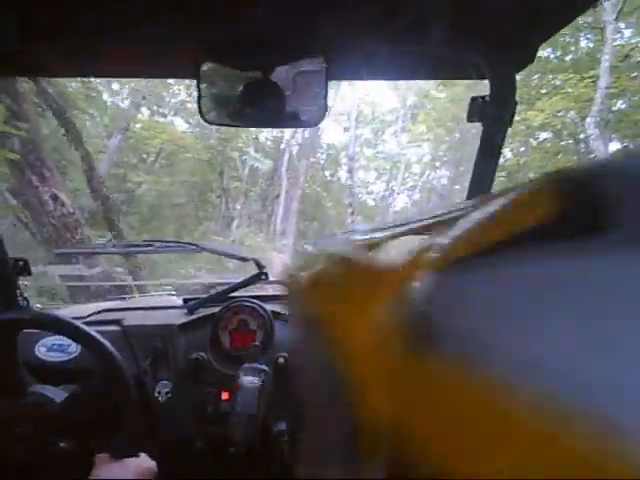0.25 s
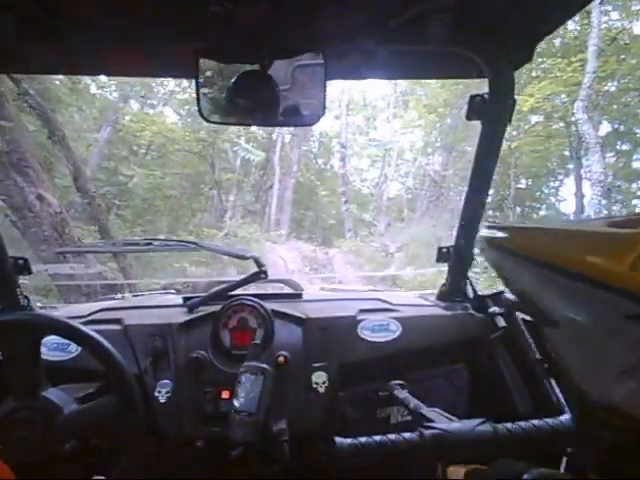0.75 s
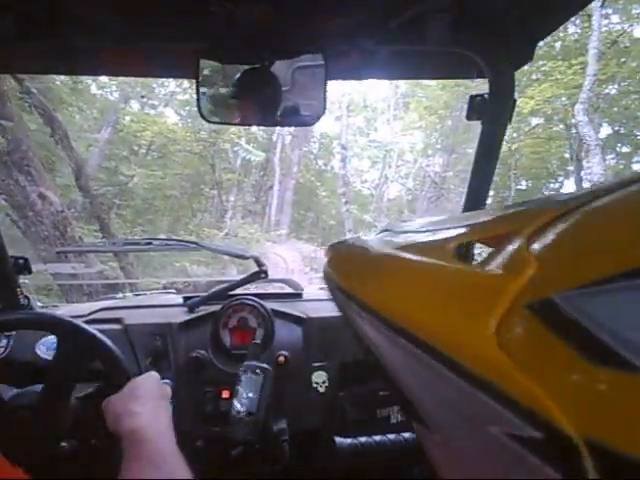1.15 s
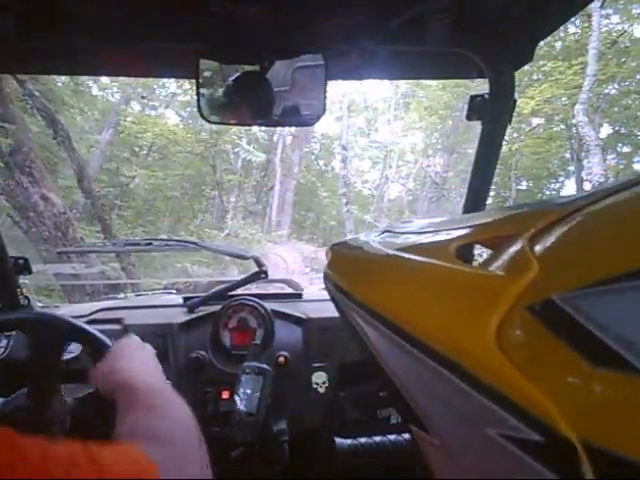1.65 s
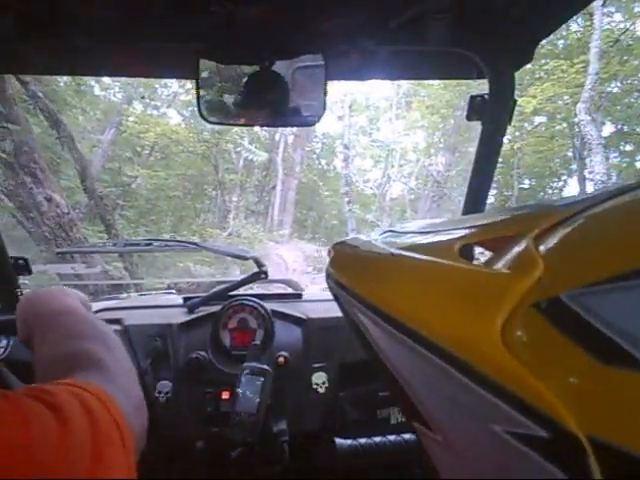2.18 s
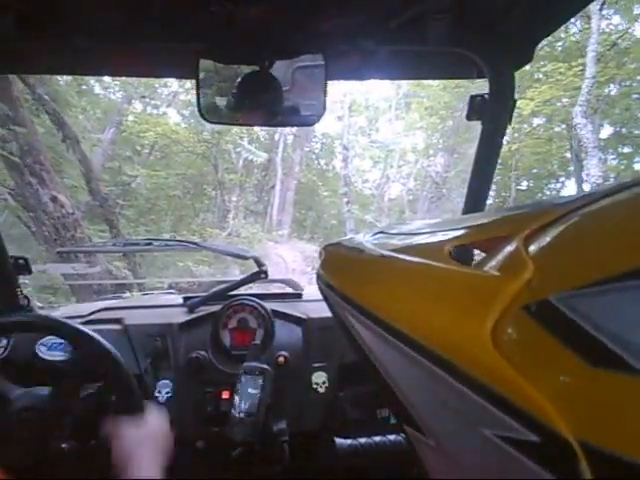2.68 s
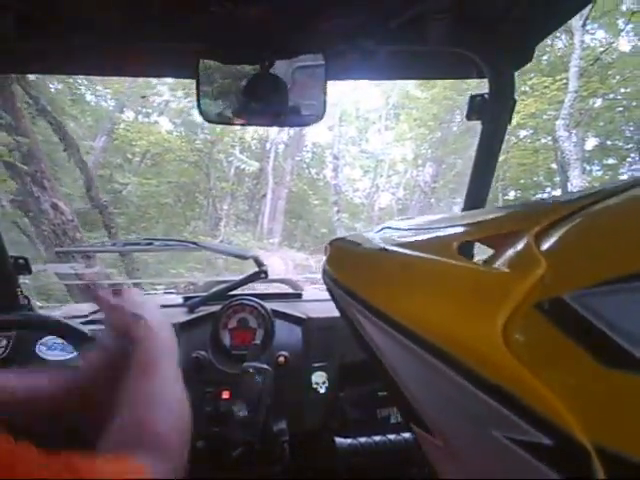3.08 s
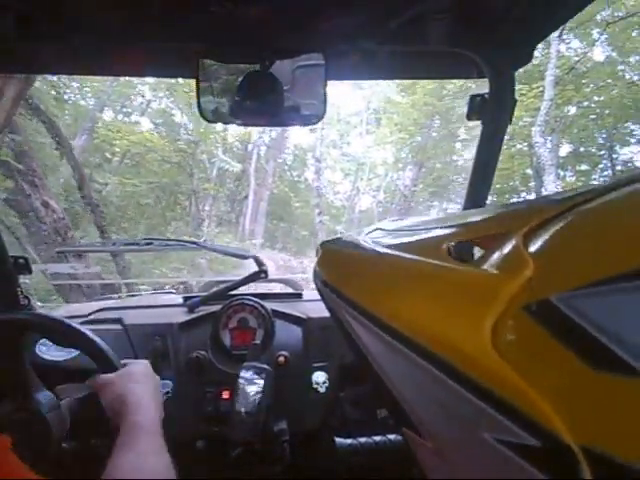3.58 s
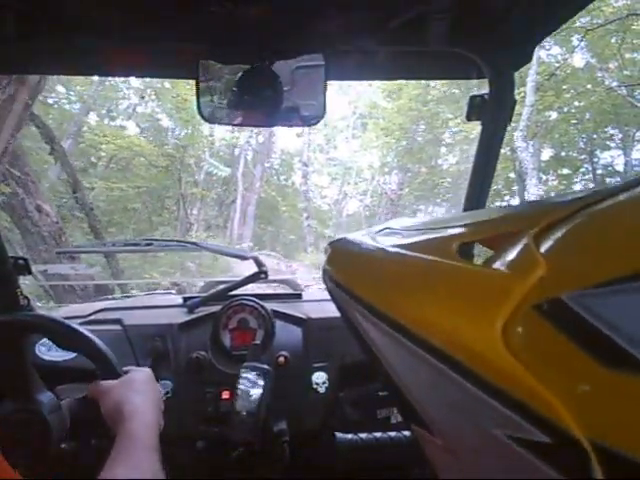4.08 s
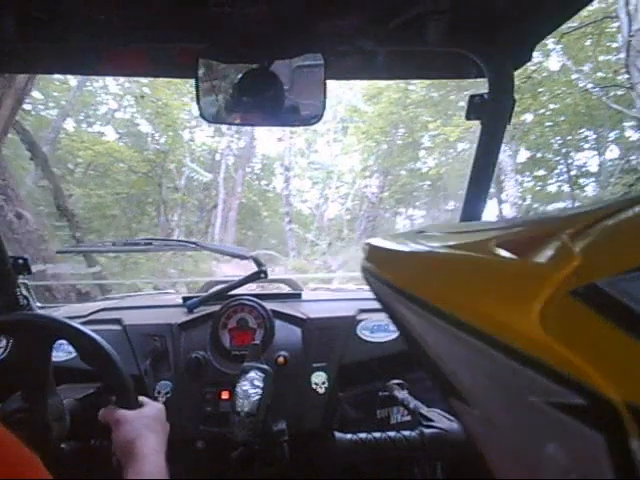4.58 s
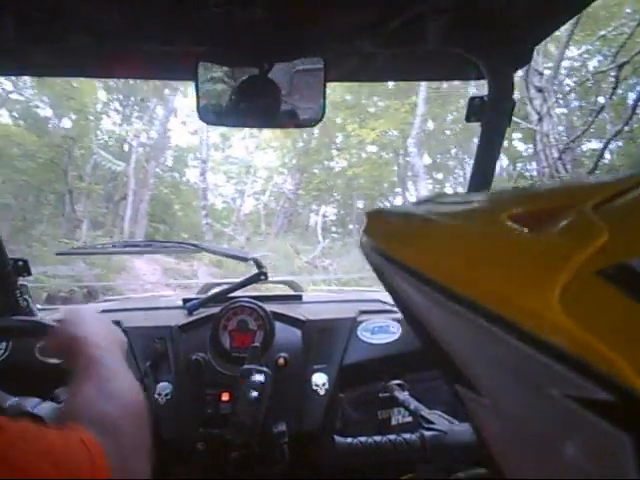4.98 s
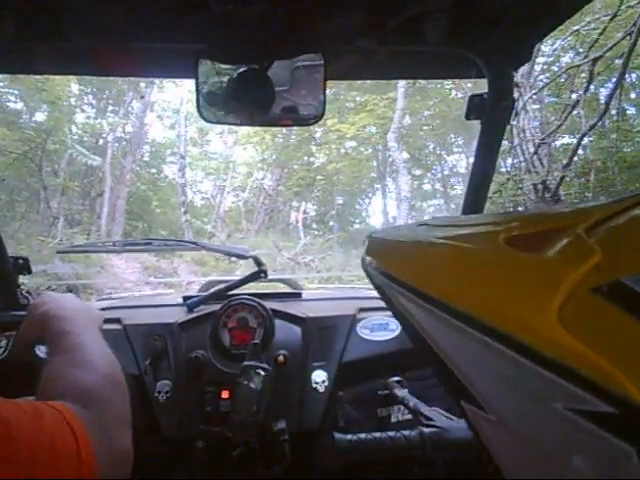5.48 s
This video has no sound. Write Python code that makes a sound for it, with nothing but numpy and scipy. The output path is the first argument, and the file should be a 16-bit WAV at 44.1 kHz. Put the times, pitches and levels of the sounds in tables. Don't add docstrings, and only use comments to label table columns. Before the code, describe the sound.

A two-cylinder engine starts high, with loud knocks as its revs fall, and settles to slow chugging with a clacking drive line. A brief dash clatter and later a grainy brush along the bodywork interrupt the idle. Then the throttle opens: revs climb fast, the cab drones, intake air roars and loose parts snap. Close, boxy in-cab microphone, clipping when loud.

```python
import sys
import numpy as np
from scipy import signal
from scipy.fft import rfft, irfft
from scipy.io import wavfile
from scipy.ndimage import uniform_filter1d

SR = 44100
rng = np.random.default_rng(int(sys.argv[2]) if len(sys.argv) > 2 else 0)


def invert_db(x):
    u = np.asarray(x, float) / 20
    return 10 ** u


def int16_out(signal):
    q = np.round(np.clip(np.atleast_2d(signal).T, -1, 1) * 32767)
    wavfile.write(sys.argv[1], SR, q.astype(np.int16))


N = 253134
TIME = np.arange(N) / SR


def evened(x):
    return x / np.sqrt(np.mean(x ** 2) + 1e-20)


def steadied(x, window):
    return x / np.sqrt(uniform_filter1d(x ** 2, size=window) + 1e-9)


def blend(clean, noisy, share):
    return share * evened(clean) + np.sqrt(1 - share ** 2) * evened(noisy)


def curves(rows):
    s, *columns = np.transpose(rows)
    return [np.interp(TIME, s, c) for c in columns]


def read(points, hz):
    f, db = np.transpose(points)
    return np.interp(np.log(hz + 1), np.log(f + 1), db)


def coloured(x, points):
    return irfft(rfft(x) * invert_db(read(points, np.fft.rfftfreq(N, 1 / SR))), N)


def panels(x, modes):
    out = np.zeros(N)
    for k, (hz, width, db) in enumerate(modes):
        pole = np.exp((2j * np.pi * hz - 1.5 * np.pi * width) / SR)
        ring = signal.lfilter([(1 - abs(pole)) ** 2], [1, -2 * pole, pole ** 2], x)
        out += (-1) ** k * invert_db(db) * ring.real
    return out


def noise():
    return rng.standard_normal(N)


def wander(hz):
    steps = rng.standard_normal(N // 100 + 2)
    drift = signal.sosfiltfilt(signal.butter(2, hz, fs=SR / 100, output="sos"), steps)
    return np.interp(TIME, np.arange(len(steps)) * 100 / SR, evened(drift))


def clicks(events):
    train = np.zeros(N)
    for s, db in events:
        train[round(s * SR)] = invert_db(db)
    return train


def bursts(events, decay_s, rise_s):
    t = np.arange(2000) / SR
    shape = np.exp(-t / decay_s) * (1 - np.exp(-t / rise_s))
    return signal.oaconvolve(clicks(events), shape)[:N] * noise()


def runs(rows, ends_db, spread_db):
    hits = []
    for first, gap, count, db, *share in rows:
        k, chance = np.arange(round(count)), rng.standard_normal(16)
        arch = (2 * (k + .5) / len(k) - 1) ** 2
        hits += [(first + gap * i, db + ends_db * arch[i] + spread_db * chance[i], *share) for i in k]
    return hits


# (time [s], crank speed [turns/s])
SPEED = [(0.0, 68.48), (0.2, 53.55), (0.33, 39.03), (0.55, 25.12), (0.95, 20.89), (1.6, 20.33),
         (2.5, 20.08), (3.0, 20.52), (3.3, 19.89), (4.05, 20.3), (4.31, 50.36), (4.62, 68.88), (4.8, 85.13),
         (4.95, 97.2), (5.16, 106), (5.4, 96.86), (5.66, 93.65), (5.74, 91)]


def crank():
    hz = curves(SPEED)[0]
    return hz, np.cumsum(hz) / SR


# (time [s], load [0-1], exhaust level [dB], cab shaking level [dB],
# chassis rumble against the exhaust [dB])
WORK = [(0, 1, -21.5, -22, -2), (.1, 1, -21, -19.5, 4.5), (.2, 0.93, -24, -16.5, 17),
        (.32, 0.72, -17, -18, -0.5), (.4, 0.73, -27, -23, -1), (.5, 0.64, -35.5, -37.5, -4),
        (.93, 0.19, -36.5, -43, -8), (1.05, 0.23, -37.5, -43.5, -5.5), (1.75, 0.2, -38.5, -44.5, -9),
        (2.3, 0.29, -39, -44.5, -5.5), (3.4, 0.07, -37, -41, -8), (4.05, 0.37, -37, -42.5, -5.5),
        (4.15, 0, -26.5, -34.5, -1.5), (4.38, 0.84, -23.5, -27.5, -10), (4.65, 0.56, -25.5, -25, -12),
        (4.8, 0.92, -25, -18.5, -1.5), (5.25, 1, -19, -14.5, -9), (5.74, 0.94, -25, -20.5, -4)]


def work():
    return curves(WORK)


# (crank order [waves/turn], idle level [dB], full load level [dB])
ORDERS = [(.5, -54, 0.5), (1, -6.5, 3.5), (1.5, -21, -10), (2, 6.5, 2), (2.5, -60, -11.5), (3, -6.5, -12.5),
          (4, 0, -10.5), (5, -4, -15), (6, -8.5, -2), (7, -15.5, -9), (8, -21, -44), (9, -34, -8.5),
          (10, -27, 7), (11, -14, -27), (12, -28, 8)]
# (frequency [Hz], level [dB])
PIPE = [(10, 24), (20, -10), (45, -3.5), (70, 0.5), (105, 3.5), (140, -5.5), (190, -1.5), (300, -11),
        (600, -7.5), (1300, -66)]
# (frequency [Hz], level [dB])
RUMBLE = [(8, -2.5), (20, -13.5), (45, 1), (90, -0.5), (130, -3), (170, -12), (280, -23), (340, -44.5)]
# (crank speed [turns/s], first order level [dB], second order level [dB])
BOOM = [(20, 0, 3), (28, 12, -7), (44, 8, 3), (51, -20, 1), (56, -1, 1), (70, 6, 6), (79, 7, -4),
        (82.5, -12, -13), (86, 3, -6), (96, 0, -7)]


def exhaust():
    hz, turns = crank()
    load, thump_db, _, rumble_db = work()
    speeds, first, second = np.transpose(BOOM)
    falling = TIME < .4
    boom_db = {1: np.where(falling, -7, np.interp(hz, speeds, first)),
               2: np.where(falling, -5.5, np.interp(hz, speeds, second))}
    thump = np.zeros(N)
    for order, idle_db, load_db in ORDERS:
        level_db = idle_db + load * (load_db - idle_db)
        level_db = level_db + read(PIPE, order * hz) + boom_db.get(order, 0)
        angle = 2 * np.pi * order * (turns - .775) - .5 - 1.1 / order ** 3
        angle = angle + .15 * np.sqrt(order) * wander(hz=6)
        thump -= invert_db(level_db + 1.5 * wander(hz=7)) * np.cos(angle)
    thump = steadied(thump, 8000)
    thump += invert_db(rumble_db) * evened(coloured(noise(), RUMBLE))
    return invert_db(thump_db + 4) * thump / np.sqrt(1 + invert_db(2 * rumble_db))


def shaking(steady, quick, shudder):
    turns = crank()[1]
    jolt, after = turns - .02, turns - .21
    sizes = invert_db(1.1 * rng.standard_normal((1000, 2)))
    force = sizes[jolt.astype(int), 0] * np.exp(-(jolt % 1) / quick)
    force += shudder * sizes[after.astype(int), 1] * np.exp(-(after % 1) / .25)
    force = steady + uniform_filter1d(force, size=90)
    force = force / np.sqrt(uniform_filter1d(force ** 2, size=6000))
    return force * invert_db(1.2 * wander(hz=12)) * noise()


# (middle time [s], half length [s], buzz change [dB], rattle change
# [dB], fizz change [dB])
LURCHES = [(0.046, 0.04, -9, -7.5, -11), (0.124, 0.019, -12, -14, -19), (0.355, 0.026, -13, -8.5, -4),
           (0.385, 0.019, -2, 6.5, 8), (0.419, 0.0089, -7, -5, -10), (0.484, 0.033, 0.5, 3, 9.5),
           (0.922, 0.01, -4, 2, 11), (2.905, 0.014, 2.5, -2, 1), (0.73, 0.042, 3, 7.5, 4.5),
           (2.065, 0.11, 5.5, 2.5, 3), (2.687, 0.014, 7.5, 8, 0), (2.99, 0.09, 0, 2, 4),
           (3.074, 0.096, 3.5, 6, 8), (4.003, 0.047, 7, 6, 4), (4.18, 0.071, -0.5, 2.5, 0),
           (4.771, 0.015, 4.5, 4.5, -3), (5.126, 0.019, -8.5, 0.5, 9)]


def lurches():
    return sum(np.outer(db, np.exp(-((TIME - s) / half) ** 2)) for s, half, *db in LURCHES)


SHAKE_IDLE_DB = -45

# (frequency [Hz], width [Hz], level [dB])
LARGE_PANELS = [(229, 116, -10.5), (395.8, 32.6, 1.5), (529, 55, -4.5), (607, 38, -2), (751, 132, -6),
                (848.7, 27, -1), (914.7, 58, 1.5), (1056, 45, -11.5)]


def buzz():
    hz, (load, _, shake_db, _) = crank()[0], work()
    rough = panels(shaking(steady=0.64 + 0.8 * load, quick=0.25, shudder=0.93), LARGE_PANELS)
    share = .8 * np.clip((hz - 22) / 25, 0, 1) * (TIME > 2)
    return invert_db(lurches()[0] + shake_db) * blend(drone(), rough, share)


# (frequency [Hz], width [Hz], level [dB])
SMALL_PANELS = [(1240, 1030, -12), (1583.5, 47, -2.5), (1878, 230, -10.5), (2045, 123, -0.4),
                (2240, 150, -7), (3272, 337, -9.5), (3594, 320, -7), (3938, 620, -11), (4660, 1360, -26),
                (5140, 320, -17.5)]
# (frequency [Hz], level [dB])
ROAR = [(900, -22), (1300, 4.5), (2000, 11.5), (2700, 0), (4000, -20), (6000, -20), (8000, -45)]
# (time [s], share [0-1])
SCRAPE = [
    (0, 0.37),
    (2.85, 0.27),
    (2.95, 0.8),
    (3.08, 1),
    (3.25, 0.8),
    (3.45, 1),
    (3.6, 0.4),
    (5.74, 1),
]


def rattle():
    load, _, shake_db, _ = work()
    steady = .12 + .6 * load + .8 * curves(SCRAPE)[0]
    rough = panels(shaking(steady, quick=.09, shudder=.3), SMALL_PANELS)
    level_db = lurches()[1] - 52 + shake_db - SHAKE_IDLE_DB
    return invert_db(level_db) * blend(coloured(noise(), ROAR), rough, .7 * load)


# (frequency [Hz], level [dB])
FIZZ = [(4000, -21), (5000, 12.5), (7300, 3.5), (8200, 10), (10500, 9.5), (12000, 7), (14000, -26),
        (17000, 10)]


def fizz():
    load, _, shake_db, _ = work()
    level_db = lurches()[2] - 64 + 0.73 * (shake_db - SHAKE_IDLE_DB) + 8 * load
    return invert_db(level_db) * evened(coloured(shaking(steady=1.5, quick=0.033, shudder=0.64), FIZZ))


# (frequency [Hz], level [dB])
WHINE = [(8000, -80), (9000, -82), (10000, -75), (15306, -75)]


def whine():
    return sum(invert_db(db + 3.6) * np.sin(2 * np.pi * hz * TIME + .5 * wander(hz=5)) for hz, db in WHINE)


# (time [s], peak level [dB], bright share [dB], low share [dB])
KNOCKS = [(0.0024, -18.5, -14, -20), (0.1143, -16, -8, -19), (0.152, -21, -23, 3), (0.2026, -12, -12.5, -4),
          (0.249, -8, -13, -21), (0.2863, -9.5, -3.5, -25), (0.2995, -6, -2.5, -24), (0.329, -13, -15, -20),
          (0.3708, -14, -12, 3.5), (0.4313, -18, -19, -3), (0.4542, -25.5, -4, -2), (0.486, -28, -7, 4),
          (0.5622, -32.5, -12, -12), (0.584, -27, -12.5, 5), (0.8005, -28.5, -25, -1), (0.927, -38, -20, 3),
          (1.8035, -41.5, -10, 16), (2.3765, -29, -19, -3), (2.8464, -29.5, -22, -5),
          (2.898, -34.5, -28, 7), (3.351, -26, -11, -4), (3.4157, -25.5, -37, -2), (3.4736, -18, -16, -4.5),
          (3.9698, -23.5, -16, -22), (4.085, -30.5, -22, 1.5), (4.3283, -24, -13, 6),
          (4.7437, -19.5, -11.5, -14), (5.003, -6, -21, -9), (5.1256, -6, -16, -22),
          (5.3828, -10.5, -34, -18),
          (.0832, -24, -25, -3), (0.14, -34, -18, -5), (.599, -36, -18, -10), (0.6134, -31.5, -18, -8),
        (0.624, -28.5, -21, -14), (.6366, -30, -20, -12), (0.649, -31, -13, -12), (0.6597, -27, -20, -6),
        (0.6721, -23, -22, 1.5), (0.68, -29.5, -11, 0), (.69, -33, -9, -8), (0.702, -39, -17, -8),
        (.717, -31.5, -24, 1), (.7643, -34, -28, -5), (.883, -41, -26, 5), (1.9914, -38, -24, -10),
        (2.006, -41, -26, -8), (2.0115, -32, -26, -8), (2.163, -44, -7, -10), (2.328, -36.5, -25, -10),
        (2.415, -33.5, -25, -4), (2.678, -35, -35, 0), (2.687, -30, -38, 5), (2.716, -30.5, -20, 7.5),
        (2.745, -53, -25, -7), (2.911, -32, -18, -3), (3.191, -42, -31, -6), (3.247, -28.5, -31, 0),
        (3.642, -46, -30, 8), (3.937, -40, -26, 5), (4.012, -29, -26, 3), (4.165, -34, -11, -8),
        (4.203, -37, -13, -4), (4.8435, -20, -14, -12), (4.9876, -19, -19, -12), (5.04, -18, -26, -10),
        (5.2088, -23, -15, -12), (5.355, -19, -15, -10), (5.432, -11, -31, -15), (5.515, -20.5, -14, -15)]
# (first time [s], gap [s], knocks [count], loudest level [dB], bright share [dB])
CHATTERS = [
    (3.305, .07, 1, -29, -36),
    (3.5094, .027, 4, -36, -22),
    (4.001, .011, 2, -29, -22),
    (5.2914, .121, 2, -13, -14),
    (4.197, .05, 1, -22, -18),
    (.0354, .07, 1, -24, -27),
]
# (time [s], peak level [dB], bright share [dB])
CLATTER = [
    (2.02, -24, -34),
    (2.0265, -17, -32),
    (2.043, -23.5, -16),
    (2.059, -19, -26),
    (2.0706, -18.5, -17),
    (2.083, -19, -21),
    (2.0925, -23.5, -30),
    (2.109, -25, -23),
    (2.124, -22, -20.5),
    (2.1324, -48, -25),
]
# (frequency [Hz], width [Hz], level [dB])
BRACKET = [(1579, 19, -12.5), (1945, 94, -1), (3453, 102, -13.5), (3915, 64, -11.5), (4514, 69, -18)]
# (frequency [Hz], level [dB])
CRACK = [(3000, -62), (4500, 4), (6500, -4), (9500, 0.5), (11800, -2), (13000, -23), (16000, -30)]


def knocks():
    chatter = runs(CHATTERS, ends_db=-23, spread_db=6.5) + CLATTER
    chatter = [(*hit, -14) for hit in chatter]
    s, db, bright_db, low_db = np.transpose(KNOCKS + chatter)
    lower = [m for m in SMALL_PANELS if m[0] < 2600]
    upper = [m for m in SMALL_PANELS if m[0] > 2600]
    upper_db = db + 0.33 * (bright_db + 16)
    out = invert_db(42.5) * panels(clicks(zip(s, db)), BRACKET)
    out += invert_db(19.5) * panels(bursts(zip(s, db), decay_s=0.0045, rise_s=0.0012), lower)
    out += invert_db(19) * panels(bursts(zip(s, upper_db), decay_s=0.0047, rise_s=0.00068), upper)
    out += invert_db(23) * panels(bursts(zip(s, db + low_db), decay_s=0.0026, rise_s=0.00039), LARGE_PANELS)
    cracks = bursts(zip(s, db + bright_db), decay_s=0.0051, rise_s=0.00073)
    return out + invert_db(4) * coloured(cracks, CRACK)


# (time [s], peak level [dB])
SNAPS = [(0.1155, -13), (.4865, -32), (.82, -38), (1.0525, -35), (1.3185, -42), (2.553, -24.5),
         (2.654, -44), (3.3518, -33), (3.4752, -38), (3.6193, -43), (4.153, -31), (4.3298, -22),
         (4.4537, -28), (5.138, -22), (5.293, -21), (5.454, -25), (5.487, -26), (5.541, -25)]
# (frequency [Hz], level [dB])
SNAP_TONE = [(1000, -20), (2500, 0), (5000, 1), (9000, -3), (13000, -5), (17000, -2)]


def snaps():
    return invert_db(9.5) * coloured(clicks(SNAPS), SNAP_TONE)


# (frequency [Hz], width [Hz], level [dB])
CASING = [(600, 40, -2), (918, 79, -2.5), (1577, 34, -6), (2110, 90, -1), (3280, 90, -8)]


def clack():
    turn = (crank()[1] - .02).astype(int)
    size = invert_db(1.5 * rng.standard_normal(1000))[turn] * (1 - work()[0]) ** 2
    return invert_db(13) * panels(size * (np.diff(turn, prepend=0) > 0), CASING)


# (time [s], peak level [dB])
THUDS = [
    (0.249, -41),
    (0.559, -31),
    (0.672, -26),
    (1.8, -35),
    (2.909, -31),
    (3.5, -29.5),
    (3.75, -33.5),
    (3.905, -32),
    (3.952, -30),
]
# (frequency [Hz], width [Hz], level [dB])
FLOOR = [(132, 32, 1), (187, 29, 7.5), (258, 460, -7)]


def thuds():
    return invert_db(24) * panels(bursts(THUDS, decay_s=0.022, rise_s=0.007), FLOOR)


# (first time [s], gap [s], ticks [count], peak level [dB])
TICKS = [(0.5366, .183, 2, -27), (.698, .05, 1, -32), (.9438, .05, 1, -29), (1.5026, .083, 2, -38),
         (2.1715, .05, 1, -33), (2.2217, .025, 3, -30), (3.0909, .05, 1, -35), (3.1114, .024, 3, -32),
         (3.2093, .023, 2, -32), (3.2844, .046, 2, -33), (3.4535, .05, 1, -33), (3.5059, .0253, 6, -31),
         (3.884, .025, 1, -35), (4.003, .025, 3, -30), (4.1053, .029, 2, -29), (4.3021, .079, 2, -28),
         (4.2279, .027, 2, -31), (4.325, .02, 2, -31), (4.399, .036, 3, -32), (4.4169, .03, 1, -27),
         (5.4525, .043, 3, -23)]
# (frequency [Hz], level [dB])
TICK_TONE = [(4500, -33), (7000, -13), (8300, 0), (10500, 3), (12000, -3), (13500, -40), (16000, -29)]


def ticks():
    return invert_db(8) * coloured(clicks(runs(TICKS, ends_db=0, spread_db=1.5)), TICK_TONE)


# (frequency [Hz], width [Hz], level [dB])
SIDE_PANEL = [(1230, 120, -8.5), (1577, 43, 2), (1985, 90, 2), (2960, 50, -11), (3540, 220, -13),
              (3930, 200, -11), (4420, 60, -13), (5030, 70, -20), (5270, 70, -19)]


def brush():
    middle_s, rise_s, fall_s = 3.07, .08, .14
    half = np.where(TIME < middle_s, rise_s, fall_s)
    rub = evened(panels(invert_db(1.5 * wander(hz=60)) * noise(), SIDE_PANEL))
    return invert_db(-42) * np.exp(-((TIME - middle_s) / half) ** 2) * rub


# (crank order [waves/turn], level [dB])
DRONE_ORDERS = [(3, 3), (4, 3), (4.5, 2), (5, -1), (5.5, 4), (6, -3), (6.5, -7), (7, 3), (7.5, -4), (8, 4),
                (8.5, -7), (9, 2), (9.5, 0), (10, 3), (12, -2), (14, -4)]
# (frequency [Hz], width [Hz], level [dB])
CAB = [(235, 150, -9), (393, 24, 2), (571, 32, 0), (755, 32, 0), (851, 40, 0), (915, 34, -1),
       (1000, 200, -12)]


def drone():
    turns, out = crank()[1], np.zeros(N)
    for order, db in DRONE_ORDERS:
        angle = 2 * np.pi * (order * turns + rng.random()) + .45 * wander(hz=8)
        out += invert_db(db + 3 * wander(hz=6)) * np.cos(angle)
    return steadied(panels(out, CAB), 8000)


def jitter():
    busy = np.clip(crank()[0] - 80, 0, 10) / 10
    at = np.flatnonzero(rng.random(N) < busy * 45 / SR)
    level_db = -22 + 3 * rng.standard_normal(len(at))
    return coloured(bursts(zip(at / SR, level_db), decay_s=0.00051, rise_s=0.00022), CRACK)


def scene():
    engine = exhaust() + buzz() + rattle() + fizz()
    looseness = invert_db(6 * work()[0])
    loose_parts = looseness * (knocks() + snaps() + thuds() + ticks())
    return (engine + loose_parts + clack() + brush() + jitter())[None]


def roll_off(x):
    return signal.sosfilt(signal.butter(12, 16690, fs=SR, output="sos"), x)


def record(dry):
    wet = dry + whine()
    flat = wet / (2 + abs(wet / .1) ** 6) ** (1 / 6)
    tilted = signal.lfilter(*signal.butter(1, 5, "high", fs=SR), flat)
    treble_edge = signal.firwin(301, 15800, window=("kaiser", 7), fs=SR)
    return roll_off(signal.oaconvolve(tilted, treble_edge[None], "same"))


dry = scene()
out = record(dry)
int16_out(out)
```